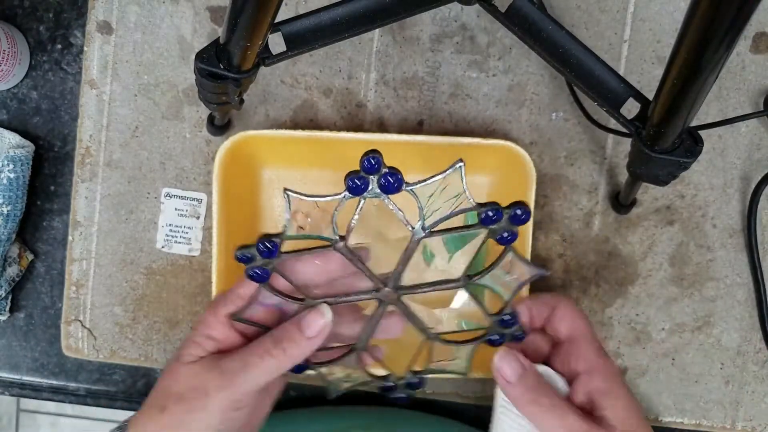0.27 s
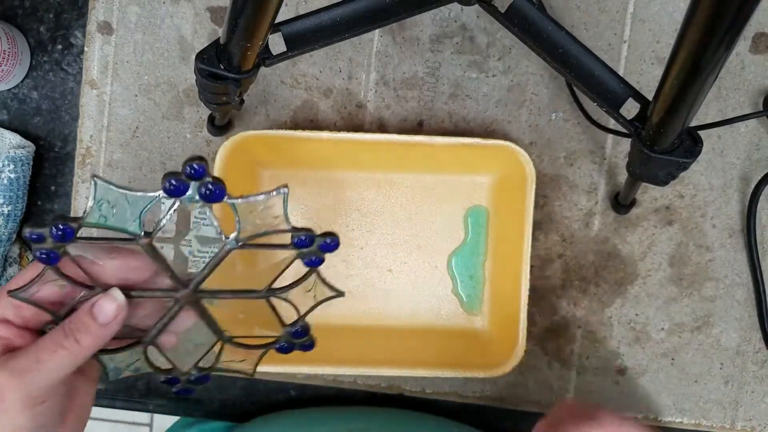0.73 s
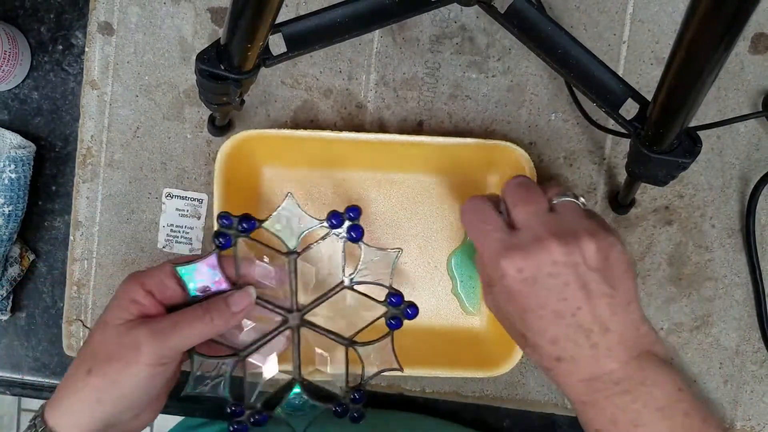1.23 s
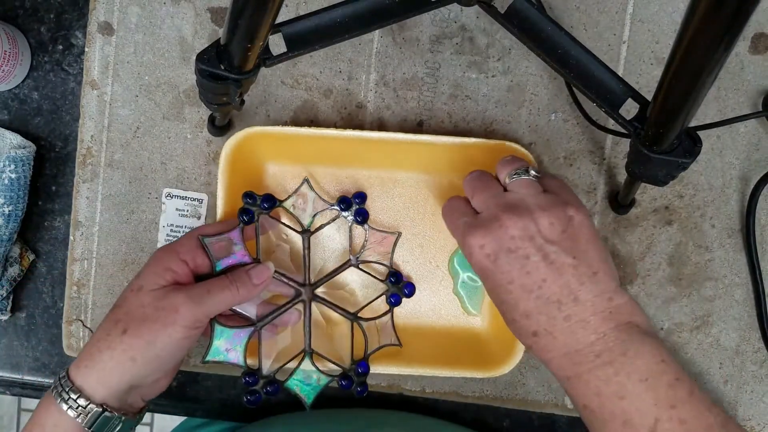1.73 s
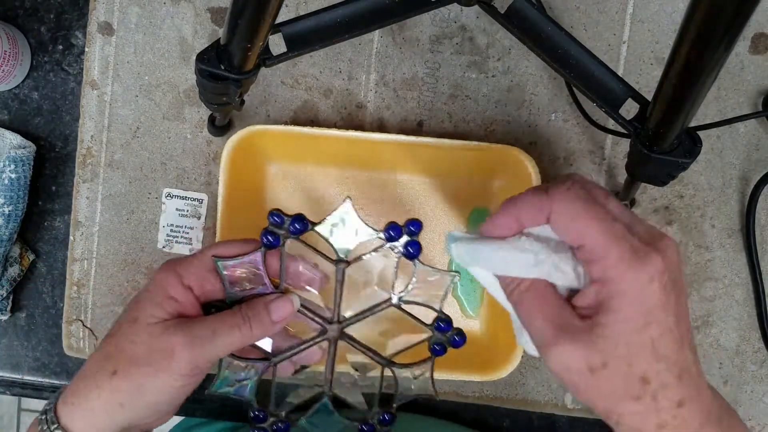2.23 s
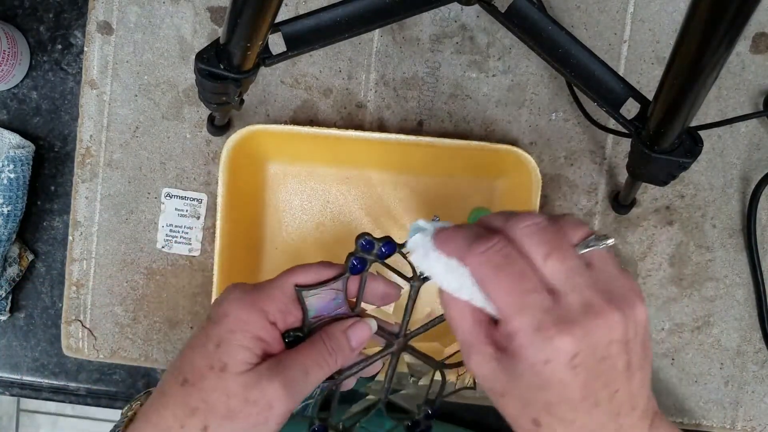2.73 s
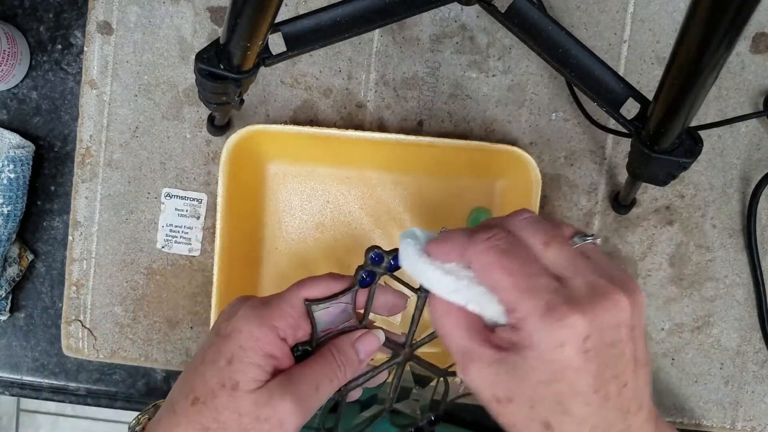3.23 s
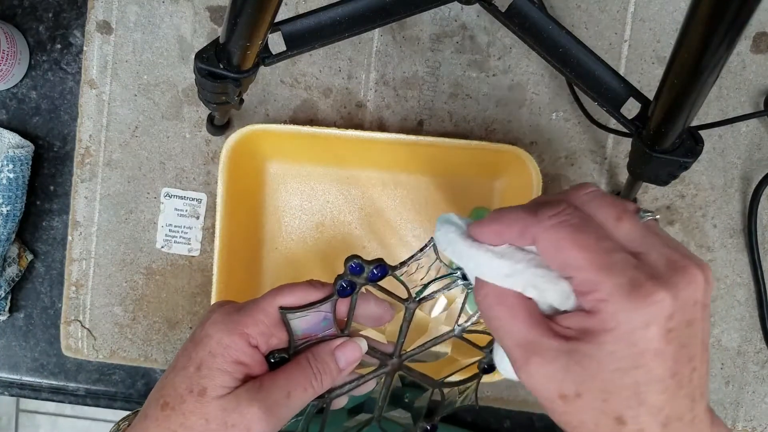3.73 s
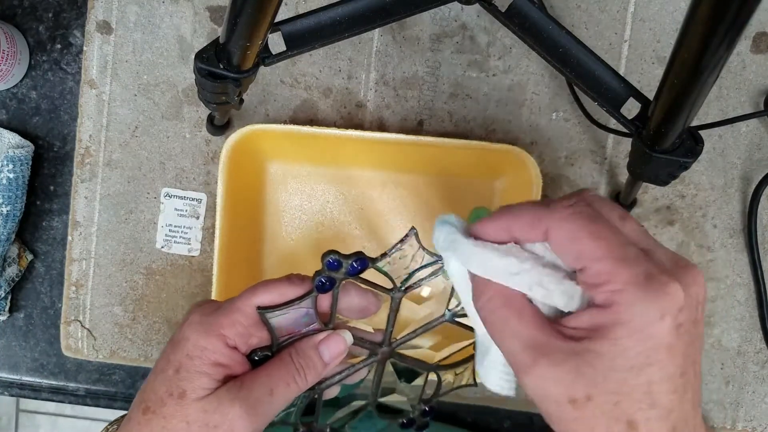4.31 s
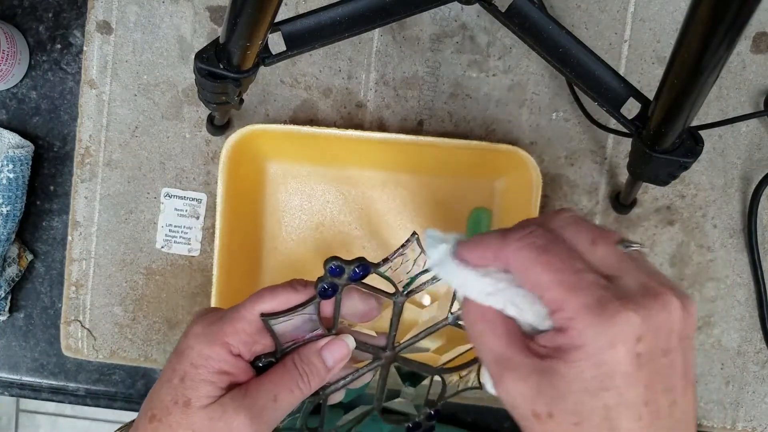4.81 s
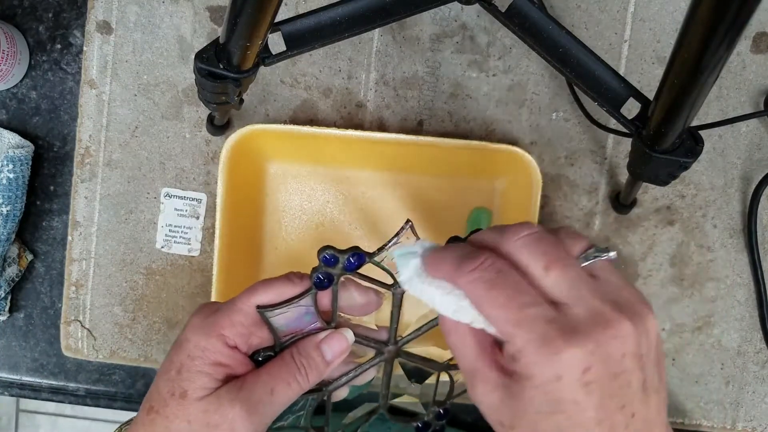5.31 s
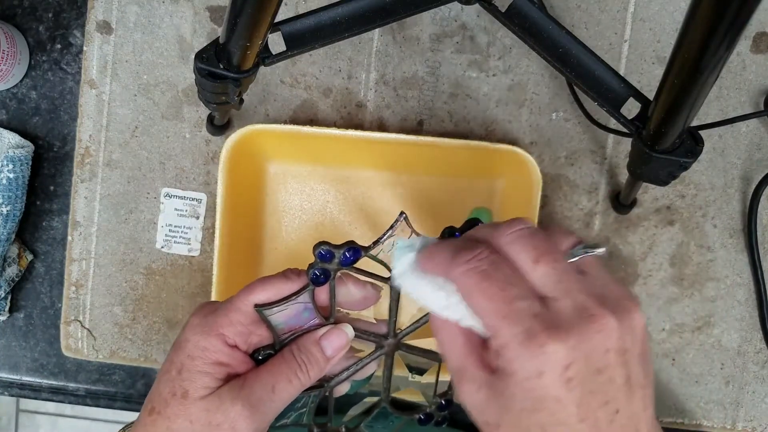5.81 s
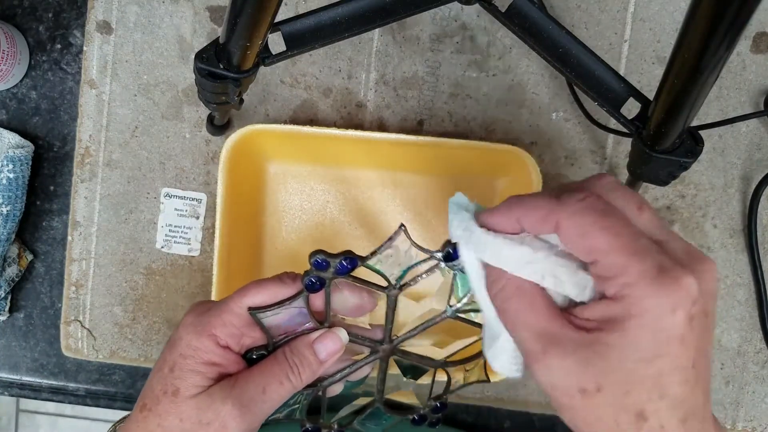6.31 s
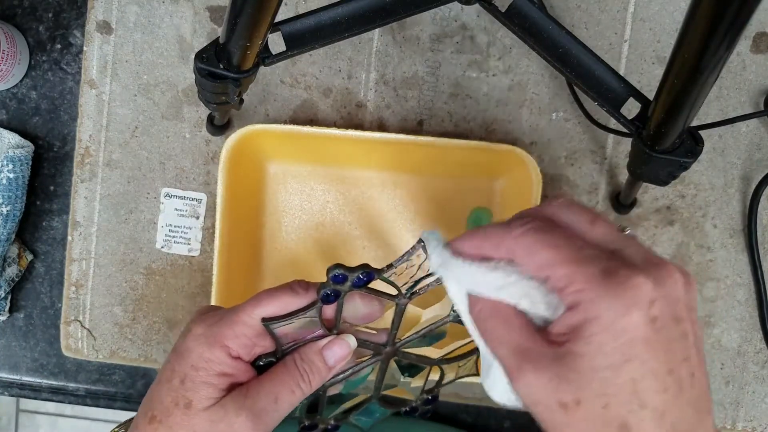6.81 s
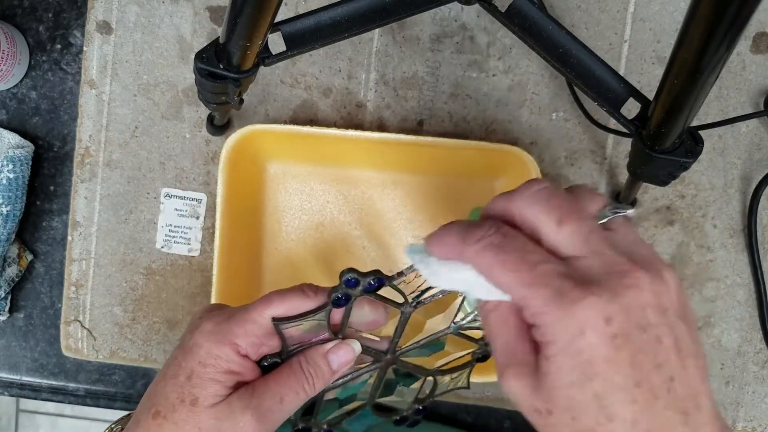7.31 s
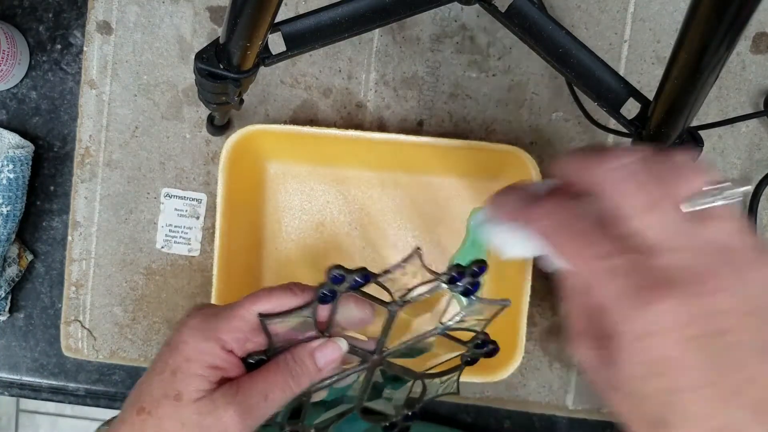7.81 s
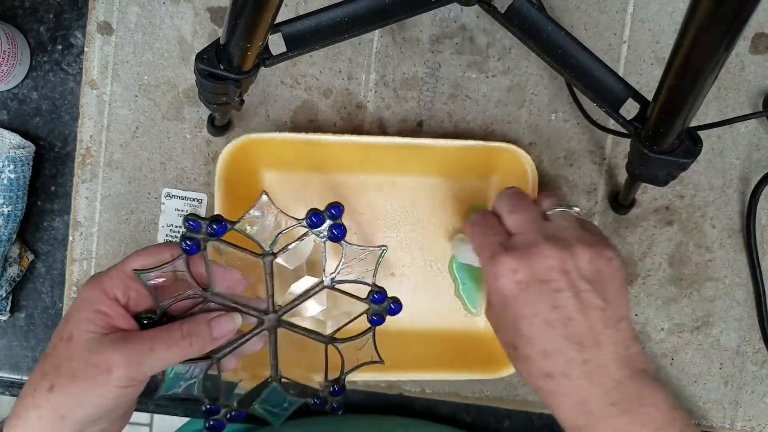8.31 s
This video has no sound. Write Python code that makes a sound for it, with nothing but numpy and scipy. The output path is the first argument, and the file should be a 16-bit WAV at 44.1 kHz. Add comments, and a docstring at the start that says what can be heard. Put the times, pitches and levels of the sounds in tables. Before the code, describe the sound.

Close to a stereo microphone in a small hard room, a paper towel rustles and crumples crisply, dabbing a foam tray with sharp ticks and a few dull knocks. After two seconds it turns to much quieter, short dry rubs on a leaded glass piece, growing firmer midway, then easing before a brisk final dab on the tray. A low hum and faint air run throughout.

```python
"""A folded paper towel is crumpled, dabbed on a foam tray and rubbed over leaded glass, close under a stereo
microphone. Shaped noise makes its fibres scratch and rings the panes; catches on seams add ticks and short rings.
Dull knocks of tray and glass are pairs of fading sines over a noise thud, in a small hard room.
Behind them an appliance motor hums as sines beating against the mains, and filtered noise makes soft room air."""
import sys
import numpy as np
from scipy import signal
from scipy.fft import rfft, irfft
from scipy.io import wavfile
from scipy.ndimage import uniform_filter1d

SR = 44100
rng = np.random.default_rng(int(sys.argv[2]) if len(sys.argv) > 2 else 0)


def log_audio(samples):
    """Write samples as a 16-bit WAV file to the path given in sys.argv[1]."""
    # one column per channel
    frames = np.atleast_2d(samples).T
    # limit to full scale, then quantise
    limited = np.clip(frames, -1, 1)
    pcm = np.round(limited * 32767).astype(np.int16)
    wavfile.write(sys.argv[1], SR, pcm)


def rack_gain(trim_db):
    """Turn a fader trim in dB into the linear factor to multiply a signal by."""
    fader = np.asarray(trim_db, float)
    return 10 ** (fader / 20)


N = 377496
T = np.arange(N) / SR  # s
HZ = np.maximum(np.fft.rfftfreq(N, 1 / SR), 1)


def along(table):
    """A table of (f/Hz, value) read at every frequency on a log axis."""
    hz, value = np.transpose(table)
    return np.interp(np.log(HZ), np.log(hz), value)


def peaks(table):
    """Gain of a set of (f/Hz, width/Hz, level/dB) resonances, each of unit noise power before its level."""
    power = 0
    for hz, width, db in table:
        shape = 2 / (1 + (2 * (HZ - hz) / width) ** 2) ** 2
        power = power + rack_gain(db) ** 2 * SR / np.pi / width * shape
    return np.sqrt(power)


def unit(x):
    """Scale to rms 1."""
    return x / np.sqrt(np.mean(x ** 2))


def pan(db):
    """Left and right gains for a level difference in dB."""
    return rack_gain(np.array([db / 2, -db / 2]))[:, None]


def walk(rate):
    """Random levels held 1 / rate s and slewed twice; spread near 1."""
    hold = int(SR / rate)
    steps = np.repeat(rng.standard_normal(N // hold + 1), hold)
    return 1.57 * uniform_filter1d(uniform_filter1d(steps, hold), hold)[:N]


def ring(hz, t60, count):
    """A sine that fades by 60 dB in t60 seconds."""
    t = T[:count]
    return np.sin(2 * np.pi * hz * t) * np.exp(-np.log(1000) * t / max(t60, .0005))


# likeness of the two microphone channels: (f/Hz, left-right correlation)
CHANNEL_LIKENESS = [(60, 1), (150, 0.88), (300, 0.83), (600, 0.62), (1200, 0.18), (2500, 0.14),
                    (5000, 0.45), (15000, 0.27)]
# channel balance: (f/Hz, left minus right level/dB)
CHANNEL_BALANCE = [(60, -2.5), (150, -0.5), (300, -1), (1000, -3), (3000, -0.7), (8000, -0.5), (14000, 1)]
# phase between the channels: (f/Hz, phase by which left leads/rad)
CHANNEL_LEAD = [(150, -0.074), (300, -0.6), (600, 0.76), (1500, -0.65), (3000, -1.25), (5000, -1.64),
                (15000, -1.58)]


def ports(two, gain):
    """Two unrelated signals become left and right, alike in the bass and less alike in the treble."""
    a, b = rfft(two) * gain
    likeness = np.clip(along(CHANNEL_LIKENESS), -1, 1)
    mid = a * np.sqrt((1 + likeness) / 2)
    side = b * np.sqrt((1 - likeness) / 2)
    tilt = rack_gain(along(CHANNEL_BALANCE) / 2) * np.exp(1j * along(CHANNEL_LEAD) / 2)
    return irfft([(mid + side) * tilt, (mid - side) / tilt], N)


# wavering mains hum: (t/s, rms level/dB to which the mains partials are added)
HUM_LEVEL = [(0.0, -46), (0.64, -41), (0.71, -42.5), (1.88, -42.5), (2.02, -45), (2.36, -41.5),
             (2.72, -44.5), (3.69, -41.5), (5.41, -43), (5.58, -46), (5.89, -42), (7.03, -43.5),
             (7.32, -40), (7.58, -45), (7.91, -41), (8.2, -42.5), (8.51, -41), (8.56, -43)]
# mains partials: (multiple of mains, level relative to the hum/dB, left minus right level/dB)
MAINS_PARTIALS = [(1, 0.5, -4), (2, -14.5, -1.5), (3, -29.5, -1), (4, -42, 2)]
# motor shaft partials: (multiple of shaft, middle rms level/dB, left minus right level/dB, t in step with mains/s)
SHAFT_PARTIALS = [(1, -65.5, -5, 0.51), (2, -59, -0.5, .125), (4, -80, -6, 0.12), (5, -78.5, 8, 0.144)]
MAINS_HZ, SHAFT_HZ = 59.98, 58.35


def hum():
    """Mains hum and the slightly slower motor shaft beat against each other; the shaft wavers in strength."""
    s, level_db = np.transpose(HUM_LEVEL)
    mains_phase = 2 * np.pi * MAINS_HZ * (T - SHAFT_PARTIALS[1][3])
    mains = sum(pan(lr_db) * rack_gain(db) * np.cos(k * mains_phase) for k, db, lr_db in MAINS_PARTIALS)
    out = mains * rack_gain(np.interp(T, s, level_db))
    for k, db, lr_db, in_step in SHAFT_PARTIALS:
        shaft_phase = mains_phase - 2 * np.pi * (MAINS_HZ - SHAFT_HZ) * (T - in_step)
        out = out + pan(lr_db) * rack_gain(db + 2.0 * walk(2.01)) * np.cos(k * shaft_phase)
    return np.sqrt(2) * out  # rms to peak


# colour of the air hiss: (f/Hz, relative level per Hz/dB)
AIR_COLOUR = [(350, -35), (600, -2), (669, -7.5), (833, -4), (1100, -9.5), (2080, -11.5), (7240, -26.5),
              (15800, -17.5)]
# room resonances fed by the air flow: (f/Hz, width/Hz, level/dB)
ROOM_MODES = [(24, 5, -55), (59.8, 11, -57.5), (73.7, 26, -55.5), (105.2, 17, -58.5), (161.2, 26, -61),
              (181, 33, -67.5), (237, 39, -69.5), (293, 48, -67.5), (357, 87, -68), (452, 39, -70.5),
              (538.7, 85, -67), (836, 12, -77), (950, 22, -78.5), (1219, 34, -76.5), (1377, 40, -82)]


def air():
    """Air flow rings the low room resonances; above them lies a smooth hiss of slightly wavering level."""
    low = ports(rng.standard_normal((2, N)), peaks(ROOM_MODES))
    hiss = unit(ports(rng.standard_normal((2, N)), rack_gain(along(AIR_COLOUR))))
    return low + hiss * rack_gain(-63.5 + .7 * walk(6))  # dB


# movements of the towel: (t of hardest rub/s, fibre hiss level, to which towel()'s 0.5 dB gain is added/dB,
# rise/s, fall/s, ring of the rubbed body relative to the hiss/dB)
TOWEL_STROKES = [(0.22, -62, 0.082, 0.11, 1), (0.314, -59, 0.062, 0.056, 3.5), (0.386, -59, .09, 0.73, 0.5),
                 (0.526, -53, 0.19, 0.59, -3), (0.69, -55.5, .3, 0.22, -1),
                 (0.768, -49.5, 0.17, 0.18, -4.5), (0.962, -51.5, 0.18, 0.069, -8),
                 (1.066, -58.5, .09, 0.04, -9), (1.166, -56, 0.05, .15, -1.5), (1.21, -53, 0.088, 0.14, -3),
                 (1.326, -50.5, 0.11, 0.17, -2), (1.39, -55, 0.09, 0.32, -6),
                 (1.456, -44.5, 0.036, 0.034, 0), (1.598, -56, 0.97, 0.21, -3.5),
                 (1.666, -57, 0.18, 0.046, 3.5), (1.758, -62.5, 0.083, .2, -9),
                 (1.844, -50.5, 0.17, 0.069, -5), (2.024, -63, .17, 0.3, -5.5), (2.402, -67, 1, .08, 0),
                 (2.62, -68.5, .3, .3, -4.5), (2.74, -61, 0.15, .042, 1), (2.868, -65, 0.15, 0.28, -4),
                 (3.012, -59.5, 0.091, .058, -3.5), (3.158, -63, .035, 0.065, -8),
                 (3.238, -65.5, .07, 0.11, -14), (3.275, -61.5, 0.069, 0.038, 0.5),
                 (3.525, -65, 0.059, 0.087, -4), (3.638, -60.5, 0.17, .055, -1),
                 (3.792, -63, 0.02, 0.059, -1.5), (3.862, -65.5, .04, 0.17, -7),
                 (3.916, -67, 0.14, 0.027, 1), (4.11, -65, 0.18, 0.27, 1.5), (4.174, -64, .1, .22, -9),
                 (4.4, -59.5, 0.026, 0.051, -2.5), (4.478, -61.5, .08, 0.11, -5.5),
                 (4.52, -65, .1, 0.15, -2.5), (4.672, -61, .014, 0.33, -3.5), (4.788, -57, 0.21, 0.075, -3),
                 (4.97, -55.5, 0.023, 0.16, -5), (5.034, -60, 0.074, .07, -2), (5.19, -57, .03, 0.18, -4),
                 (5.312, -61.5, 0.2, .07, -3.5), (5.398, -59, 0.053, 0.14, -7),
                 (5.527, -54.5, 0.1, .07, -2.5), (5.6, -62.5, .05, 0.076, -6),
                 (5.632, -57, 0.086, 0.043, -5), (5.736, -57.5, 0.094, 0.085, -3),
                 (5.836, -58, 0.073, .12, -5.5), (5.875, -63, 0.068, 0.035, 0),
                 (5.96, -55.5, 0.076, .055, -2), (6.04, -54.5, .05, .09, -5),
                 (6.085, -61.5, 0.056, 0.11, -1), (6.286, -66.5, .045, .02, -11),
                 (6.415, -56, 0.1, 0.056, -3), (6.48, -60, .04, 0.18, -1.5), (6.53, -63, 0.16, 0.043, -3.5),
                 (6.67, -58.5, 0.11, 0.081, -2.5), (6.812, -59, 0.25, 0.078, -3.5),
                 (6.916, -53, 0.061, 0.057, -2), (7.0, -70, .2, .2, 4), (7.058, -61.5, .12, 0.044, -3),
                 (7.128, -68, .048, .14, -6), (7.215, -68, .025, 0.27, -2), (7.324, -61.5, 0.21, 0.13, -1),
                 (7.46, -61.5, 0.17, 0.14, -2.5), (7.628, -62.5, 0.13, .05, -2.5),
                 (7.668, -59.5, .012, 0.24, -1.5), (7.87, -65, 0.058, 0.54, -5),
                 (8.008, -64, .03, .062, -9), (8.234, -61.5, 0.013, 0.31, 0.5),
                 (8.322, -55.5, 0.026, 0.2, -7), (8.398, -50.5, .15, .05, -3), (8.432, -56, .04, .03, 1),
                 (8.514, -56.5, .055, 0.12, -3)]
STROKE_DEPTH_DB = 20  # rise and fall are the times to climb and drop this far
STROKE_ROUND = 1.04  # 1 = pointed top, 2 = round top with steep ends
REST_DB, REST_RING_DB = -90, 7.5  # still towel: hiss (towel()'s gain is added), body ring relative to it


def effort():
    """Each stroke climbs to its hardest rub and drops away; neighbours add in power."""
    t = T[::88]
    s, db, rise, fall, ring_db = np.transpose(TOWEL_STROKES)[:, :, None]
    before = (s - t) / np.maximum(rise, .005)
    after = (t - s) / np.maximum(fall, .005)
    away = np.where(t < s, before, after)
    power = rack_gain(db - STROKE_DEPTH_DB * away ** STROKE_ROUND) ** 2
    hiss = power.sum(axis=0) + rack_gain(REST_DB) ** 2
    body = (power * rack_gain(ring_db) ** 2).sum(axis=0) + rack_gain(REST_DB + REST_RING_DB) ** 2
    return np.interp(T, t, 10 * np.log10(hiss)), np.interp(T, t, 10 * np.log10(body / hiss))


def scratch(rate, spread_db, smooth_db):
    """Fibres let go as dense ticks of uneven size over a finer hiss; grip flickers quickly."""
    ticks = (rng.random(N) < rate / SR) * rack_gain(spread_db * rng.exponential(size=N))  # rate in ticks per s
    grip = uniform_filter1d(ticks, size=24) * 24 + rack_gain(smooth_db)
    return unit(grip * rack_gain(1.62 * walk(60)) * rng.standard_normal((2, N)))


# colour of the paper fibres close to the microphone: (f/Hz, relative level per Hz/dB)
FIBRE_COLOUR = [(2060, -50), (3500, -8), (3920, 4), (6450, 2), (6960, -0.5), (8960, 4.5), (15100, 7),
                (15800, -14)]
# resonances of panes and tray: (f/Hz, width/Hz, relative level/dB)
PANE_MODES = [(652, 500, 7.5), (970, 200, -1), (1280, 220, -2), (1600, 210, 1.5), (1967, 320, -1.5),
              (2250, 510, 5), (2673, 140, -3.5), (3010, 420, 4), (3514, 450, 1.5)]
# where the towel works, tray then glass then tray: (t/s, resonance nearest the spot under a firm rub/Hz)
WORKING_SPOT = [(0, 1600), (0.7, 1590), (1.2, 1740), (1.9, 2100), (2.5, 1650), (3.6, 1360), (4.7, 1640),
                (7.6, 1600), (8.56, 2070)]
FIRM_DB, SPOT_OCTAVES_PER_DB = -55, 0.04  # a firmer rub rings higher modes


def towel():
    """Strokes: fibre hiss, and the same scratching heard through panes or tray; modes near the spot ring most."""
    hiss_db, body_db = effort()
    firm_spot_hz = np.interp(T, *np.transpose(WORKING_SPOT))
    spot_hz = firm_spot_hz * 2 ** (SPOT_OCTAVES_PER_DB * (hiss_db - FIRM_DB))
    rub = rfft(unit(ports(scratch(900, 2.7, 13.2), 1)))
    hiss = unit(irfft(rub * rack_gain(along(FIBRE_COLOUR)), N))
    body, power = 0, 0
    for mode in PANE_MODES:
        octaves_away = np.abs(np.log2(mode[0] / spot_hz))
        # each mode flickers as the fingers shift their hold
        share = rack_gain(-4 * octaves_away + 2.33 * walk(70))
        body = body + share * irfft(rub * peaks([mode]), N)
        power = power + (share * rack_gain(mode[2])) ** 2
    return rack_gain(hiss_db + 0.5) * (hiss + rack_gain(body_db) * body / np.sqrt(power))  # overall towel gain 0.5 dB


# towel catches on a seam or crease: (t/s, nominal peak level/dB, ring f/Hz, ring relative to peak/dB)
SEAM_SNAGS = [(0.2044, -49.5, 1680, -8), (0.3112, -49, 2150, -3), (0.4244, -50, 1600, -3),
              (0.5882, -39.5, 1590, -5), (1.1518, -36.5, 1200, -14.5), (1.313, -36.5, 2100, -11),
              (1.4452, -32.5, 1310, -11), (1.652, -34.5, 1640, -21), (1.747, -41.5, 2340, -9),
              (1.8033, -46, 2260, -8), (1.8363, -31, 950, -12), (1.869, -38.5, 2900, -14),
              (2.0066, -47.5, 1230, -1.5), (2.6908, -42, 2150, -13), (2.7087, -42.5, 2160, -10),
              (3.0056, -44, 1670, -4), (3.0194, -53, 1170, -5), (3.2512, -40, 1800, -14),
              (3.268, -50, 950, -4), (3.6273, -48, 1000, 0.5), (3.899, -49, 2000, -4),
              (4.1102, -38, 4700, -11), (4.4722, -45.5, 2950, -13), (4.672, -42, 1760, -18),
              (4.9686, -41, 1760, -16), (5.1921, -62, 1680, 8), (5.3954, -51, 1000, -10),
              (5.519, -41, 1680, -10), (5.5902, -45, 2040, -16), (5.7351, -45, 1600, -2.5),
              (6.0794, -50, 1940, -4), (6.4602, -50, 1670, -15), (6.6631, -42, 3620, -9.5),
              (7.2968, -44, 1280, -14), (7.6665, -41, 2160, -20), (7.8516, -44, 1330, -24),
              (7.8864, -46, 2250, -11), (7.981, -53, 2210, -4), (8.004, -44.5, 11800, -3),
              (8.2445, -42, 1220, -15), (8.3205, -36.5, 1740, -15), (8.3855, -38.5, 1850, -7.5),
              (8.4186, -42, 1600, -3.5), (8.4304, -47, 1880, -1)]
SNAG_T60_S, SNAG_RING_T60_S = .042, 0.041
SNAG_ROUGH = 2.5  # how ragged the ring is
SNAG_CLICK_DB, SNAG_CLICK_S = -3, .004  # tick through the panes: level over the ring, time constant
SNAG_SNAP_DB, SNAG_SNAP_CYCLES = 1, 5  # dry snap at the ring's pitch: level over the ring, T60 in cycles


def snags():
    """A sharp tick through the panes, a dying burst of fibre noise, a dry snap and a short ragged ring."""
    count = 8192
    (burst, click, snap, rings), t = np.zeros((4, N + count)), T[:count]
    for s, db, hz, ring_db in SEAM_SNAGS:
        i = int(s * SR)
        span = slice(i, i + count)
        fade = (1 - np.exp(-t / 0.0004)) * np.exp(-np.log(1000) * t / SNAG_T60_S)
        burst[span] += rack_gain(db - 9.5) * fade  # noise rms below its peak
        click[span] += rack_gain(db + ring_db + SNAG_CLICK_DB) * np.exp(-t / SNAG_CLICK_S)
        snap[span] += rack_gain(db + ring_db + SNAG_SNAP_DB) * ring(hz, SNAG_SNAP_CYCLES / hz, count)
        rings[span] += rack_gain(db + ring_db) * ring(hz, SNAG_RING_T60_S, count)
    fibres = rack_gain(along(FIBRE_COLOUR))
    noise = unit(ports(rng.standard_normal((2, N)), fibres + 0.075 * peaks(PANE_MODES)))
    panes = unit(ports(rng.standard_normal((2, N)), peaks(PANE_MODES) + 3.6 * fibres))
    ragged = (1 + SNAG_ROUGH * walk(1200)) / np.hypot(1, SNAG_ROUGH)
    pitched = (snap[:N] + rings[:N] * ragged) * pan(-0.58)
    return burst[:N] * noise + click[:N] * panes + pitched


# dull knocks of tray and glass: (t/s, nominal peak level/dB, main ring f/Hz, left minus right level/dB,
# broad thud relative to peak/dB)
TRAY_KNOCKS = [(0.456, -50, 355, -1, -4), (0.769, -42.5, 965, -1.0, -3), (1.313, -31.5, 188, -3, -1.5),
               (2.016, -36.5, 485, -15, -16.5), (3.005, -46.5, 468, 1, -9), (3.627, -47.5, 357, -1, -0.5),
               (3.9, -48.5, 390, -2, -3), (5.626, -48.5, 338, 0, -10), (6.905, -54.5, 296, -2, 2),
               (7.651, -51.5, 525, -4, -6)]
# close pair of knock modes: (multiple of main ring f, relative level/dB, share of T60)
MODE_PAIR = [(1, -3, 0.93), (.92, -7, 0.6)]
KNOCK_T60_S = .135


def knocks():
    """A soft blow rings a close pair of modes, over a short thud of many higher ones."""
    count = 16384
    t = T[:count]
    out = np.zeros((2, N + count))
    push = -np.hanning(24) / 12
    noises = rng.standard_normal((len(TRAY_KNOCKS), count))
    for (s, db, hz, lr_db, thud_db), noise in zip(TRAY_KNOCKS, noises):
        i = int(s * SR)
        body = sum(rack_gain(d) * ring(k * hz, share * KNOCK_T60_S, count) for k, d, share in MODE_PAIR)
        swell = 1 - np.exp(-t * hz / 0.62)  # the soft contact builds the ring over about a cycle
        band = signal.butter(2, [1.17 * hz, 2.5 * hz], "bandpass", fs=SR, output="sos")
        thud = unit(signal.sosfilt(band, noise))
        thud = rack_gain(thud_db) * thud * np.exp(-np.log(1000) * t / (0.47 * KNOCK_T60_S))
        blow = np.convolve(body * swell, push)[:count] + thud
        out[:, i:i + count] += rack_gain(db) * pan(lr_db) * blow
    return out[:, :N]


def walls(x, t60, wet_db):
    """A small hard room: a fading noise tail, its own in each channel."""
    t = T[:16384]
    tail = rng.standard_normal((2, 16384)) * np.exp(-np.log(1000) * t / t60) * (t > .004)
    tail = tail / np.sqrt(np.sum(tail ** 2, axis=1, keepdims=True))
    return x + rack_gain(wet_db) * signal.fftconvolve(x, tail, axes=1)[:, :N]


def scene():
    """Towel close by, snags and knocks with the room's reflections, over hum and air."""
    return towel() + walls(snags() + knocks(), 0.18, -3.0) + hum() + air()


def roll_off(x):
    """The treble ends steeply here."""
    return signal.sosfilt(signal.butter(12, 16730, fs=SR, output="sos"), x)


def record(dry):
    """The microphone drops the deepest bass; the converter adds a small constant offset."""
    low_cut = signal.butter(4, 43.5, "highpass", fs=SR, output="sos")  # Hz
    heard = signal.sosfilt(low_cut, dry) - .0007
    return roll_off(heard)


dry = scene()
out = record(dry)
log_audio(out)
```